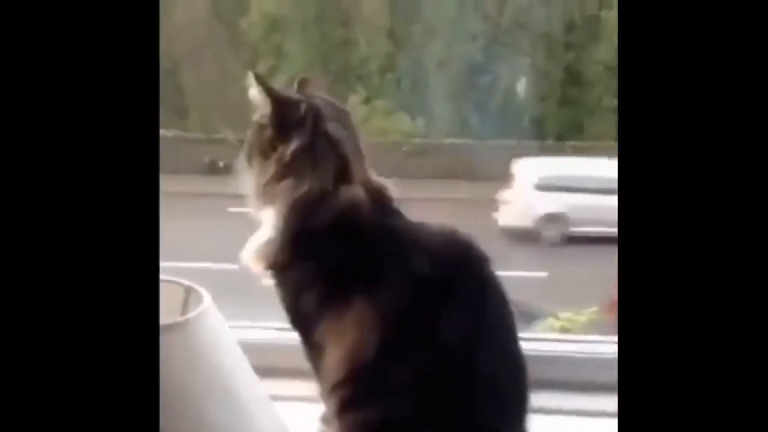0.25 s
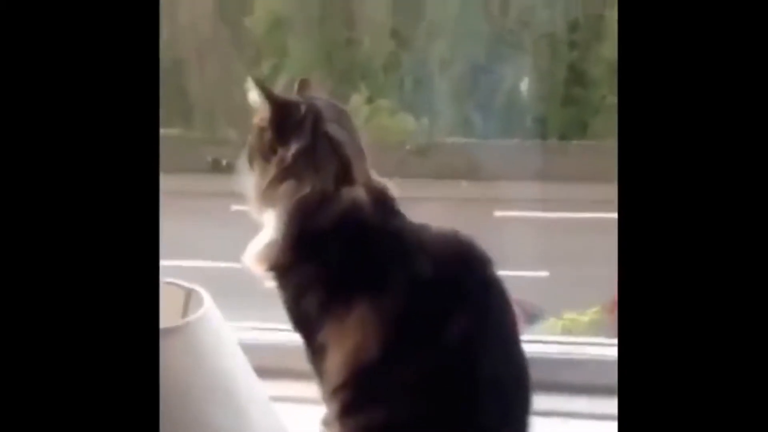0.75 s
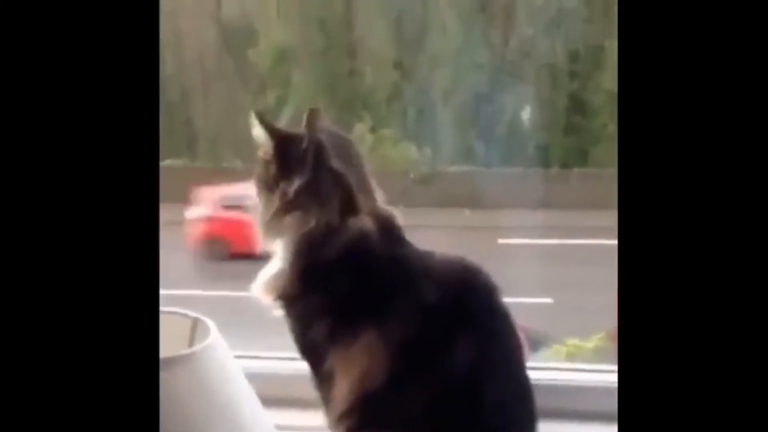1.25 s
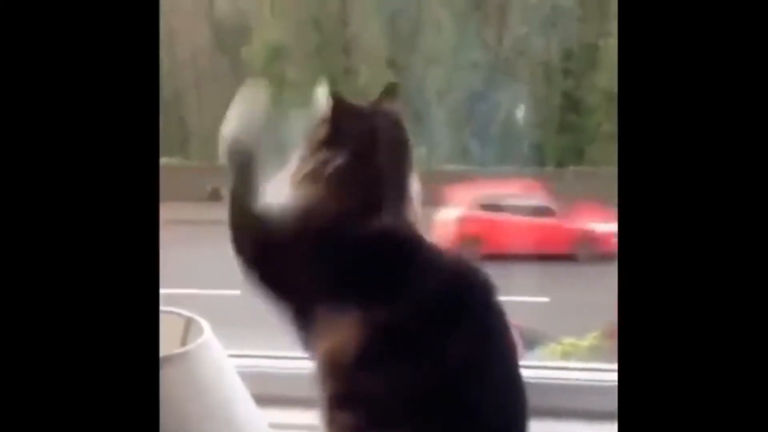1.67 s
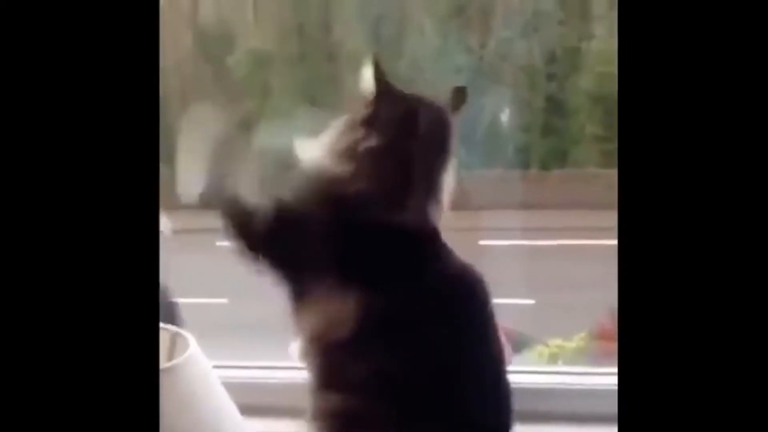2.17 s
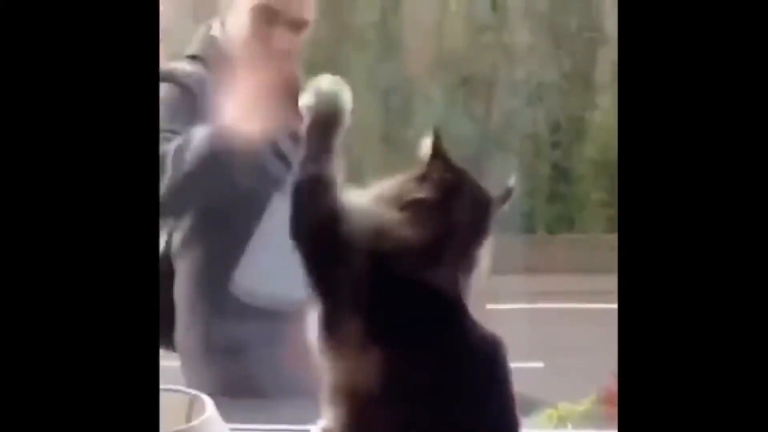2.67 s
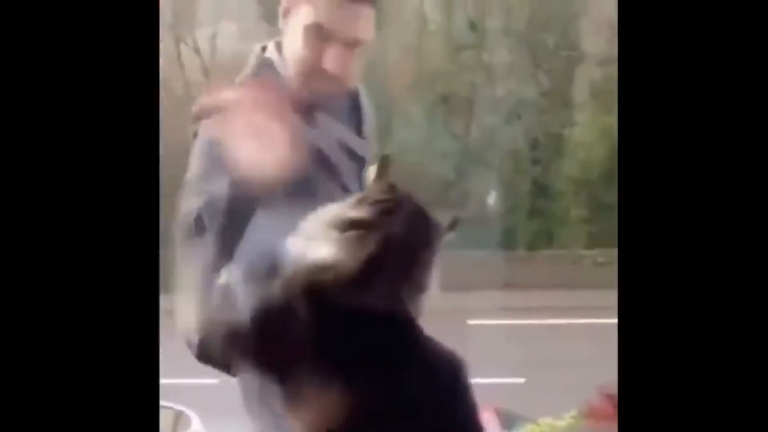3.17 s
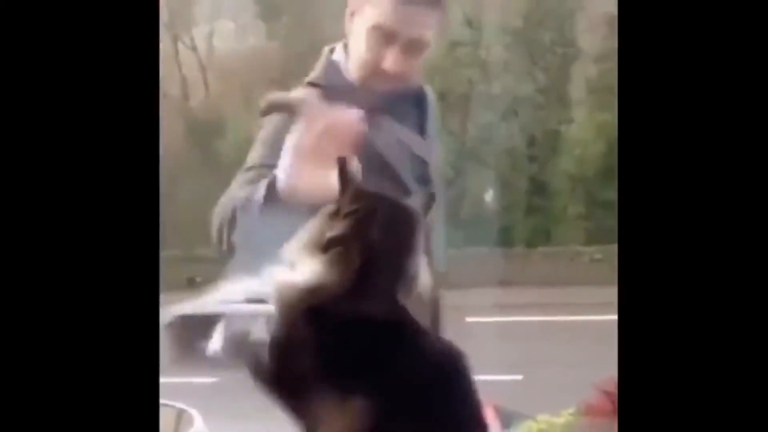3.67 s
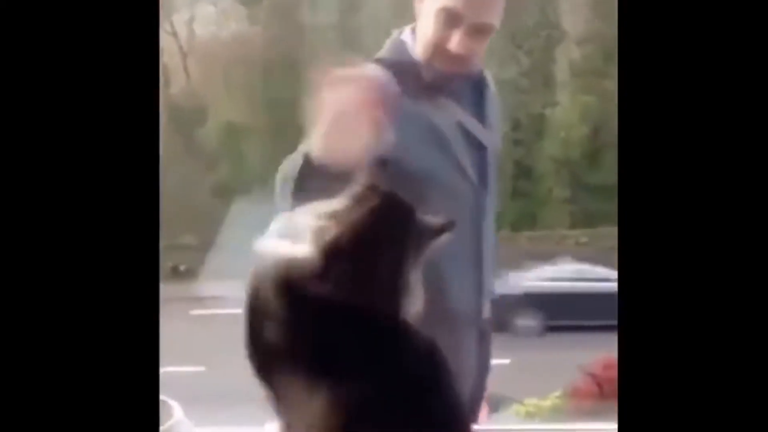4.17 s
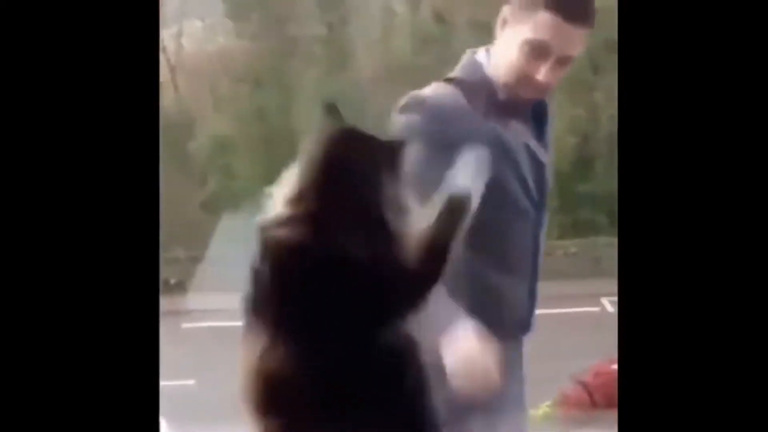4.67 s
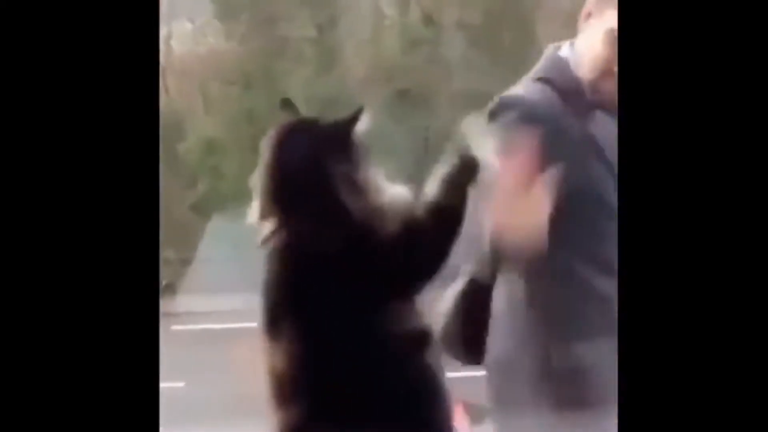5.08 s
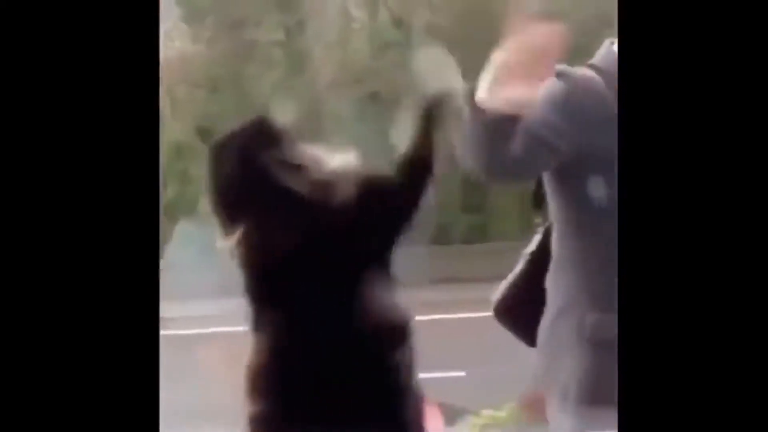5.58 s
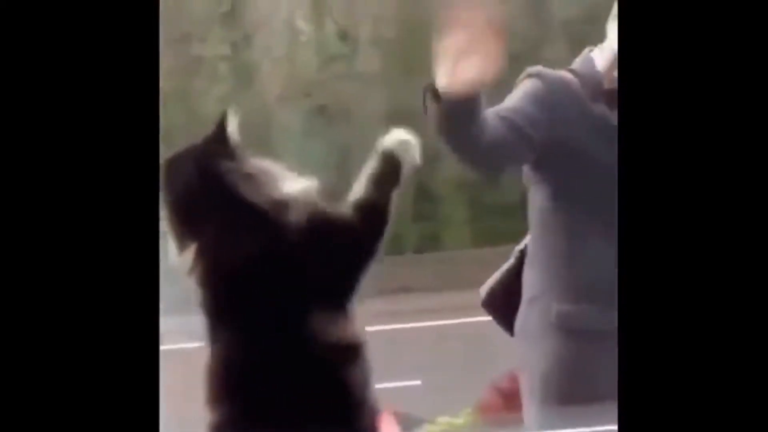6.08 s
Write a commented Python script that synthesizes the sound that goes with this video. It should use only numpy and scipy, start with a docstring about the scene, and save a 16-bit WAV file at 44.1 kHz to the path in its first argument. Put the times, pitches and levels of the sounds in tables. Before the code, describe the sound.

A quiet low drone and faint hiss run throughout, indoors by a window, with the muffled tyres of a passing car fading over the first second. At about 0.6 seconds a loud, gusty rush swells up close, full of rumble, rough scrapes, dull bumps and a wavering hollow hum. A hard knock marks its peak near 0.8 seconds, followed by a brief falling note. The rush drops at 1.1 seconds and dies away by about 1.7. From 1.9 seconds a cat paws at the pane, far more quietly, two or three strokes a second. Each is a soft thud with a dry claw tick and skid, ringing briefly in the small room. Tiny, thin squeaks come around 2.3 to 2.7 seconds and again from 4.7. The strokes then quicken to about five a second, with the sharpest tick near 5.1, and continue until 6.3 seconds.

```python
"""Cat pawing at a window

Pads thud on the pane and squeak faintly as they slip; claws tick and skid. A small room rings with each tap.
Early on, a loud gusty rush with scrapes, a knock and a hollow hum swells and dies away.
Underneath: a low drone, faint hiss and the tyres of a car passing outside."""
import sys
import numpy as np
from scipy import signal
from scipy.fft import rfft, irfft, next_fast_len
from scipy.io import wavfile
from scipy.ndimage import uniform_filter1d, minimum_filter1d

SR = 44100
rng = np.random.default_rng(int(sys.argv[2]) if len(sys.argv) > 2 else 0)


def file_out(sig):
    """Save sig as 16-bit WAV at sys.argv[1]."""
    # one column per channel
    cols = np.atleast_2d(sig).T
    # limit, then scale
    lim = np.clip(cols, -1, 1)
    pcm = np.round(lim * 32767).astype(np.int16)
    wavfile.write(sys.argv[1], SR, pcm)


N = 279234
T = np.arange(N) / SR

# background spectra: f/Hz, gain/dB
DRONE_SPECTRUM = [(20, -36.5), (50, -14), (105, -10), (135, -7), (175, -7), (213, 6), (240, -5), (265, 0),
                  (290, -15), (322, -7), (375, -15.5), (480, -19), (800, -23), (1150, -37), (2000, -23.5)]
TYRE_SPECTRUM = [(30, -11.5), (100, 2), (200, 0), (280, 3), (360, -7), (560, -3), (750, -7), (1100, -5),
                 (1450, -8.5), (2000, -11.5), (3500, -21), (6000, -34)]
AIR_SPECTRUM = [(300, -30), (1000, -31.5), (1600, -20), (2600, -8.5), (3100, -4.5), (4400, -4), (6000, -6),
                (7400, -6.5), (8000, -10)]
# background envelopes: t/s, level/dB
DRONE_LEVEL = [(.35, -63), (.48, -71), (1.5, -65.5), (6.3, -67)]
CAR_LEVEL = [(0, -67), (.08, -66), (.25, -67.5), (.42, -69), (.58, -70), (1.0, -85.5), (1.7, -77.5),
             (6.4, -78)]
# dull bumps: t/s, peak/dB, f/Hz, length/s
BUMPS = [(0.377, -51.5, 323, 0.0088), (0.426, -54.5, 294, 0.0083), (0.644, -34.5, 116.4, 0.044),
         (.753, -20.5, 126, 0.017), (0.897, -24, 104, 0.019), (0.985, -19.5, 134, 0.015),
         (1.042, -25, 166, .026), (1.291, -36, 83.7, 0.034), (4.397, -43, 248.8, 0.051),
         (5.059, -65, 63.2, 0.047), (5.492, -55.5, 50, 0.026), (5.863, -60, 54.3, 0.047),
         (6.08, -57, 78, 0.029)]
# spectra of the rush's noises: f/Hz, gain/dB
RUMBLE_SPECTRUM = [(15, -41), (35, -8.5), (60, -0.5), (125, -3.5), (160, 3.5), (220, -16.5), (400, -67.5)]
ROAR_SPECTRUM = [(110, -42), (180, 2.5), (235, 6), (310, 0), (385, 2.5), (440, -4.5), (500, -5.5),
                 (570, -5.5), (680, -11.5), (770, -12), (825, -11.5), (880, -13), (1000, -15.5),
                 (1500, -25.5)]
RASP_SPECTRUM = [(600, -44), (1070, -4.5), (1250, -8.5), (1430, 0), (1610, -2.5), (1850, 3.5), (2020, -4),
                 (2200, 1), (2780, -1), (2950, -8), (3400, -3.5), (3800, -9.5), (5000, -51.5)]
HISS_SPECTRUM = [(2500, -27), (3600, -2), (5500, -3.5), (7000, -9.5), (8000, -18.5)]
KNOCK_SPECTRUM = [(200, -16.5), (450, 5.5), (800, 9), (1050, 0), (1450, 0.5), (2100, -4.5), (2800, -6),
                  (3150, -23), (7000, -43.5)]
# gusts: peak t/s, rise/s, t60/s, roar level/dB, tilt/(dB/oct)
GUSTS = [(0.644, 0.011, 0.99, -48, -4), (0.708, 0.017, 0.25, -35.5, -6.5), (.717, 0.0044, 0.46, -46, -0.5),
         (0.761, 0.015, 0.29, -28.5, -4), (0.784, 0.0048, 0.52, -29, -10), (.868, 0.03, 0.65, -36.5, -6),
         (0.909, 0.016, 0.19, -37.5, -3), (1.004, 0.013, 0.38, -43.5, -8),
         (1.043, 0.033, 0.24, -36.5, -8.5), (1.31, 0.04, 0.69, -59, -15)]
# hollow hum's pitch: t/s, f/Hz
HUM_PITCH = [(.645, 175.6), (0.695, 209), (.75, 181.3), (0.8, 163.6), (.835, 160.2), (0.858, 142.5),
             (0.882, 184.6), (.92, 160.7), (.96, 170.1), (1.3, 168.3)]
# width of the rush's hiss: t/s, side re mid/dB
HISS_WIDTH = [(.68, -29), (.705, 8), (.73, -16), (.76, -50)]
# scrapes: t/s, level/dB, catch window/s, tilt/(dB/oct)
SCRAPES = [(.636, -60.5, 0.0049, -12), (.666, -49, 0.0096, 12), (.694, -49, 0.013, -11),
           (.715, -40.5, 0.0094, -0.5), (.771, -27.5, 0.0099, 1), (.794, -33, 0.0066, 0),
           (.856, -35, 0.01, -3), (.886, -37.5, 0.014, -6.5), (.906, -42, .01, -5),
           (.938, -41.5, .012, -3.5), (.991, -38.5, 0.0036, -9), (1.006, -35, .012, -10.5),
           (1.039, -45.5, 0.0077, -1.5), (1.075, -43.5, 0.005, -10.5)]
# hollow modes rung by scrapes: f/Hz, gain/dB, t60/s
HOLLOW_MODES = [(386, -2.5, 0.12), (568, -0.5, 0.075), (642, 0.5, 0.097), (743, -1.5, .12),
                (826.5, 0, 0.14), (1070, -10.5, 0.13), (1440, -6, .1), (1615, -3, .1), (2010, -1, 0.041),
                (2370, -4.5, 0.027), (2820, 1, 0.045)]
# falling note: t/s, f/Hz, level/dB
WHISTLE_GLIDE = [(.83, 830, -53), (.87, 800, -41.5), (.893, 689, -38.5), (.91, 608, -43), (.94, 616, -57)]
# sharpest claw ticks: t/s, level/dB, tilt/(dB/oct)
CLICKS = [(1.887, -59, -5), (1.948, -59.5, -7), (2.19, -63, -11), (2.206, -62, -8), (2.4695, -65, 0),
          (2.793, -57, 10), (4.397, -64, 7), (4.827, -65, -7), (5.076, -46.5, 0), (5.103, -65, 7),
          (5.445, -60.5, -4), (5.863, -66, 4), (5.874, -62, -6), (6.083, -61, -2)]
# glass modes under a claw: f/Hz, gain/dB, t60/s
GLASS_MODES = [(654, -5, 0.0026), (1044, -6.5, 0.0041), (1440, -7.5, 0.0077), (1850, -3.5, .008),
               (2400, 2, 0.006), (2730, 3, 0.0069), (3162, 1.5, 0.012), (3530, -1.5, 0.011),
               (4060, 0, 0.0079), (4320, -3.5, 0.0057), (5110, -5, 0.0022), (6500, -4, 0.001)]
# room decay: f/Hz, t60/s
ROOM_DECAY = [(100, 0.54), (260, 0.33), (700, 0.46), (2000, 0.25), (5000, 0.34)]
# paw strokes: t/s, pad level/dB, pad contact/s, claw level/dB, skid time scale/s,
# claw tilt/(dB/oct), drag delay/s, drag level/dB
STROKES = [(1.889, -55.5, 0.0049, -56, 0.0099, -4.5, .059, -66.5),
           (1.976, -59.5, 0.0049, -74, 0.008, -5, .059, -83),
           (2.187, -57.5, 0.0014, -50.5, .012, -3.5, 0.039, -70),
           (2.468, -57.5, 0.0027, -58, .011, -2.5, 0.068, -65),
           (2.786, -49, 0.0033, -57, 0.0092, -3.5, 0.033, -66),
           (3.171, -61, 0.0055, -70, 0.022, -6.5, .059, -67),
           (3.601, -52, 0.0027, -54.5, .014, -1, 0.071, -71),
           (3.972, -53.5, 0.0015, -69, 0.022, -0.5, 0.051, -66),
           (4.392, -49.5, 0.00065, -61.5, 0.011, 5, 0.02, -64.5),
           (4.714, -54, 0.0044, -81, 0.013, 7, 0.045, -74),
           (4.824, -64, 0.00036, -59.5, 0.017, -1, 0.029, -66),
           (5, -59, 0.0077, -73, 0.0083, 0, 0.051, -73), (5.065, -50.5, 0.0011, -52, .011, 2, .026, -68),
           (5.251, -62, 0.00045, -57.5, .014, 1, 0.029, -62),
           (5.445, -58.5, 0.0021, -59.5, 0.0097, -4, 0.023, -58.5),
           (5.648, -56, .003, -61, 0.036, 0.5, 0.043, -76),
           (5.86, -50.5, 0.0019, -50, .012, -0.5, 0.021, -57.5),
           (6.063, -58, 0.0011, -62.5, .011, 1.5, 0.015, -62.5),
           (6.298, -54.5, 0.0014, -66.5, .021, 11, .066, -77)]
# claw scuff: f/Hz, gain/dB
SCUFF_SPECTRUM = [(500, -13), (950, -8.5), (1300, -12.5), (1750, -3), (2600, -1), (3300, -5.5), (4300, -3),
                  (5200, -8), (7500, -24)]
# bending modes of the free pane: f/Hz, gain/dB, t60/s
PANE_MODES = [(102, -18, 0.35), (159, 2, 0.18), (217.2, 2.5, 0.29), (262.4, 2, 0.19), (321.4, -2, 0.34),
              (394.3, -4.5, 0.18), (522, -6, 0.092), (727, -8, 0.073), (1060, -12, 0.046)]
# pad slips: t/s, length/s, level before taper/dB, f/Hz
SQUEAKS = [(2.314, .035, -75, 4320), (2.53, 0.029, -68, 4360), (2.577, 0.025, -66.5, 4300),
           (2.628, 0.026, -69, 4320), (2.664, 0.054, -70.5, 4400), (4.737, .029, -68.5, 4310),
           (5.154, .03, -70, 4300), (5.331, 0.024, -61, 4300), (5.346, .026, -66, 4300),
           (5.55, 0.028, -70, 4320), (5.95, .03, -70, 4350)]

SIDE = np.array([[1], [-1]])  # left, right
LN_1000 = np.log(1000)  # 60 dB of decay


def undb(db):
    """Decibels to gain."""
    return 10 ** (np.asarray(db) / 20)


def unit(x):
    """Scale to rms 1."""
    return x / np.sqrt(np.mean(x ** 2))


def curves(table):
    """Interpolate each column over time."""
    times, *columns = np.transpose(table)
    return [np.interp(T, times, column) for column in columns]


def along(points, hz):
    """Interpolate (f/Hz, value) points over log frequency."""
    f, value = np.transpose(points)
    return np.interp(np.log(np.maximum(hz, 1)), np.log(f), value)


def colour(x, spectrum):
    """Filter by (f/Hz, gain/dB) points; -12 dB/oct above the last."""
    size = next_fast_len(len(x), True)
    hz = np.fft.rfftfreq(size, 1 / SR)
    gain = undb(along(spectrum, hz)) / np.maximum(hz / spectrum[-1][0], 1) ** 2
    return irfft(rfft(x, size) * gain, size)[:len(x)]


def walk(rate_hz):
    """Smooth random wander, rms 1."""
    hold = max(int(SR / rate_hz), 1)
    steps = np.repeat(rng.standard_normal(N // hold + 1), hold)[:N]
    return unit(uniform_filter1d(steps, hold))


def noise(spectrum, flutter_db, rate_hz):
    """Coloured noise of wandering level, rms 1."""
    return unit(colour(rng.standard_normal(N), spectrum) * undb(flutter_db * walk(rate_hz)))


def tone(hz):
    """Sine following a pitch curve."""
    return np.sin(2 * np.pi * np.cumsum(hz) / SR)


def add(track, at_s, sound):
    """Mix a sound into a track."""
    i = int(at_s * SR)
    track[i:i + len(sound)] += sound[:max(N - i, 0)]


def at_level(x, db):
    """Set the rms of the loudest 10 ms."""
    return x * undb(db) / np.sqrt(uniform_filter1d(x ** 2, SR // 100).max())


def ring(hz, db, t60_s, spot_db, detune, size=SR // 2):
    """Decaying modes of alternating sign; a random strike spot weights each."""
    t = T[:size, None]
    spot, shift = rng.standard_normal((2, len(hz)))
    strength = undb(db + spot_db * spot) * (-1) ** np.arange(len(hz))
    modes = np.sin(2 * np.pi * hz * (1 + detune * shift) * t) * np.exp(-LN_1000 * t / t60_s)
    return modes @ strength


def background(air_db=-74, width_db=-22):
    """Low drone, tyres dulled by the glass, hiss with a trace of width."""
    (car_db,), (drone_db,) = curves(CAR_LEVEL), curves(DRONE_LEVEL)
    drone = undb(drone_db) * noise(DRONE_SPECTRUM, 1.0, 5.8)
    tyres = undb(car_db) * noise(TYRE_SPECTRUM, 0.39, 4.3)
    air = undb(air_db) * noise(AIR_SPECTRUM, 0.15, 3.1)
    side = undb(air_db + width_db) * noise([(3000, -25), (4500, -15.5), (7500, -0.5)], 3.3, 30)
    return drone + tyres + air + SIDE * side


def bumps():
    """Soft, heavily damped thumps of a few cycles."""
    out = np.zeros(N)
    for at_s, db, hz, length_s in BUMPS:
        t = T[:int(length_s * SR)]
        add(out, at_s, undb(db) * np.hanning(len(t)) * np.sin(2 * np.pi * hz * t))
    return out


def swell(attack_s, tail_t60_s, start_s=0.609, end_s=1.1026, release_s=0.033, tail_db=-10):
    """Rush envelope: build, hold, quick drop, fading tail."""
    build = np.clip((T - start_s) / attack_s, 0, 1) ** 1.43
    after_s = np.maximum(T - end_s, 0)
    tail = undb(tail_db) * np.exp(-LN_1000 * after_s / tail_t60_s)
    return build * np.maximum(np.exp(-after_s / release_s), tail)


def burst(peak_s, rise_s, t60_s):
    """Envelope: Gaussian rise, exponential fade."""
    t = T - peak_s
    return np.exp(-(np.minimum(t, 0) / rise_s) ** 2 - LN_1000 * np.maximum(t, 0) / t60_s)


def gusts(octaves):
    """Power-summed gust envelope, this many octaves above the roar."""
    return np.sqrt(sum((undb(db + tilt * octaves) * burst(peak_s, rise_s, t60_s)) ** 2
                       for peak_s, rise_s, t60_s, db, tilt in GUSTS))


def rush(roar_db=-41, rumble_db=-34.5):
    """Turbulent gusts over a swelling rumble, with hum and knock; the hiss briefly flares wide."""
    roar_gain = np.hypot(gusts(0), undb(roar_db) * swell(attack_s=0.15, tail_t60_s=0.7))
    hiss_gain = gusts(octaves=3.85)
    eddies = undb(0.66 * walk(130))  # shake the upper bands together
    roar = roar_gain * noise(ROAR_SPECTRUM, 0.89, 49.39)
    rasp = gusts(octaves=2.1) * noise(RASP_SPECTRUM, 0.65, 200)
    hiss = hiss_gain * noise(HISS_SPECTRUM, 1.4, 150)
    rumble = undb(rumble_db) * swell(attack_s=0.15, tail_t60_s=1.33) * noise(RUMBLE_SPECTRUM, 0.36, 25)
    mid = eddies * (roar + rasp + hiss) + rumble + knock() + hum()
    width_db, = curves(HISS_WIDTH)
    side = hiss_gain * undb(width_db) * noise(HISS_SPECTRUM, 1.5, 150)
    return mid + SIDE * side


def hum(level_db=-28.5, waver=0.015, flutter_db=2.26):
    """Hollow hum; the pitch lifts, sinks and settles."""
    hz, = curves(HUM_PITCH)
    note = unit(tone(hz * (1 + waver * walk(65.9))))
    return undb(level_db + flutter_db * walk(45)) * swell(attack_s=0.2, tail_t60_s=0.69) * note


def scrapes(crack_db=6, crack_decay_s=0.0022, count=5):
    """Bursts of catches, each a dry crack with a hollow ring."""
    out, t = np.zeros(N), T[:SR // 4]
    hz, mode_db, t60_s = np.transpose(HOLLOW_MODES)
    for at_s, db, window_s, tilt in SCRAPES:
        force = np.zeros(len(t))
        force[(rng.random(count) * window_s * SR).astype(int)] = rng.standard_normal(count) / 2
        force[0] = 1
        body = ring(hz, mode_db + tilt * np.log2(hz / 1000), t60_s, spot_db=1, detune=0.0053, size=len(t))
        spectrum = [(300, -3), (1000, 8.5), (2800, tilt - 2), (3500, tilt - 9),
                    (4600, tilt - 16), (7000, tilt - 24)]
        crack = unit(colour(rng.standard_normal(len(t)), spectrum)) * np.exp(-t / crack_decay_s)
        add(out, at_s, at_level(signal.fftconvolve(force, body + undb(crack_db) * crack), db))
    return out


def knock(level_db=-26.5):
    """Hard, noisy knock at the height of the rush."""
    envelope = burst(peak_s=0.772, rise_s=0.004, t60_s=0.22)
    return undb(level_db) * envelope * noise(KNOCK_SPECTRUM, 0.75, 220)


def whistle(waver=0.021, flutter_db=2):
    """Rough, hollow note sliding down mid-rush."""
    hz, db = curves(WHISTLE_GLIDE)
    gate = (T > WHISTLE_GLIDE[0][0]) & (T < WHISTLE_GLIDE[-1][0])
    return gate * undb(db + flutter_db * walk(130)) * unit(tone(hz * (1 + waver * walk(200))))


def glass(tilt, spot_db, detune):
    """Brief ring of the pane after one claw catch; tilt in dB/oct."""
    hz, db, t60_s = np.transpose(GLASS_MODES)
    return ring(hz, db + tilt * np.log2(hz / 3000), t60_s, spot_db, detune, size=SR // 20)


def room(x, wet_db, onset_s=0.009):
    """Direct sound plus a diffuse tail, drawn afresh per call."""
    t = T[:SR // 2]
    hz, white = np.fft.rfftfreq(len(t), 1 / SR), rfft(rng.standard_normal(len(t)))
    band_hz, band_t60_s = np.transpose(ROOM_DECAY)
    tail = 0
    for t60_s, share in zip(band_t60_s, np.eye(len(band_hz))):
        band = irfft(white * along(np.c_[band_hz, share], hz), len(t))
        tail += band * np.exp(-LN_1000 * t / t60_s)
    tail *= 1 - np.exp(-t / onset_s)  # wall echoes build up
    response = undb(wet_db) * tail / np.linalg.norm(tail)
    response[0] += 1
    return signal.fftconvolve(x, response)


def clicks():
    """A claw tip hits the glass squarely: one sharp tick."""
    out = np.zeros(N)
    for at_s, db, tilt in CLICKS:
        tick = glass(tilt, spot_db=0, detune=0.049)
        add(out, at_s, at_level(room(tick, wet_db=-4), db))
    return out


def claw_skid(skid_s, tilt, scatter_db=4, friction_db=-21, scuff_db=-5, count=9):
    """Claws catch and slip; the glass rings under a dry scuff."""
    t = T[:SR // 8]
    press = np.sqrt((t / skid_s) * np.exp(-(t / skid_s) ** 2))
    catches = undb(scatter_db * rng.standard_normal(count)) * rng.choice([-1, 1], count)
    force = undb(friction_db) * rng.standard_normal(len(t))
    force[(rng.random(count) * 1.5 * skid_s * SR).astype(int)] += unit(catches)
    ticks = signal.fftconvolve(force * press, glass(tilt, spot_db=2.5, detune=0.025))[:len(t)]
    spectrum = [(hz, db + tilt * np.log2(hz / 3000)) for hz, db in SCUFF_SPECTRUM]
    scuff = press * colour(rng.standard_normal(len(t)), spectrum)
    return unit(ticks) + undb(scuff_db) * unit(scuff)


def claws(drag_s=0.015, drag_db_per_oct=5, wet_db=-2.5):
    """Two skids per stroke: pressing in, then brighter as the paw drags down."""
    out = np.zeros(N)
    for at_s, _, _, claw_db, skid_s, tilt, delay_s, drag_db in STROKES:
        landing = room(claw_skid(skid_s, tilt), wet_db)
        drag = room(claw_skid(drag_s, tilt + drag_db_per_oct), wet_db)
        add(out, at_s, at_level(landing, claw_db))
        add(out, at_s + delay_s, at_level(drag, drag_db))
    return out


def pads(heel_delay_s=0.021, heel_db=-5):
    """Toes, then heel, bend the whole pane; longer contact, duller thud."""
    out, t = np.zeros(N), T[:SR // 50]
    hz, mode_db, free_t60_s = np.transpose(PANE_MODES)
    t60_s = 0.92 * free_t60_s  # damped by the resting paw
    for at_s, db, contact_s, _, skid_s, *_ in STROKES:
        land_s = at_s + 0.55 * skid_s  # partway into the skid
        push = np.sin(np.pi * np.minimum(t / contact_s, 1)) ** 2
        for delay_s, part_db in (0, 0), (heel_delay_s, heel_db):
            thud = signal.fftconvolve(ring(hz, mode_db, t60_s, spot_db=1.5, detune=0.043), push)
            add(out, land_s + delay_s, at_level(room(thud, wet_db=-4), db + part_db))
    return out


def squeaks(waver=0.012, flutter_db=3):
    """Pad stick-slip on glass: a thin, unsteady whistle."""
    out = np.zeros(N)
    wander, grip = waver * walk(500), undb(flutter_db * walk(250))
    for at_s, length_s, db, hz in SQUEAKS:
        span = slice(int(at_s * SR), int(at_s * SR) + int(length_s * SR))
        squeak = grip[span] * tone(hz * (1 + wander[span]))
        add(out, at_s, undb(db) * np.hanning(len(squeak)) * unit(squeak))
    return room(out, wet_db=-10)[:N]


def scene():
    """Stereo mix; only the hisses have width."""
    paws = claws() + clicks() + pads() + squeaks()
    return paws + rush() + scrapes() + whistle() + bumps() + background()


def record(dry):
    """Peak limiter, then a steep low-pass."""
    ceiling_db, cutoff_hz, window = -16.5, 7750, SR // 40
    peak = np.maximum(np.abs(dry).max(axis=0), 1e-9)
    allowed = np.minimum(1, undb(ceiling_db) / peak)
    gain = uniform_filter1d(minimum_filter1d(allowed, window), window)
    lowpass = signal.ellip(10, 0.2, 70, cutoff_hz, fs=SR, output="sos")
    return signal.sosfilt(lowpass, dry * gain)


dry = scene()
out = record(dry)
file_out(out)
```